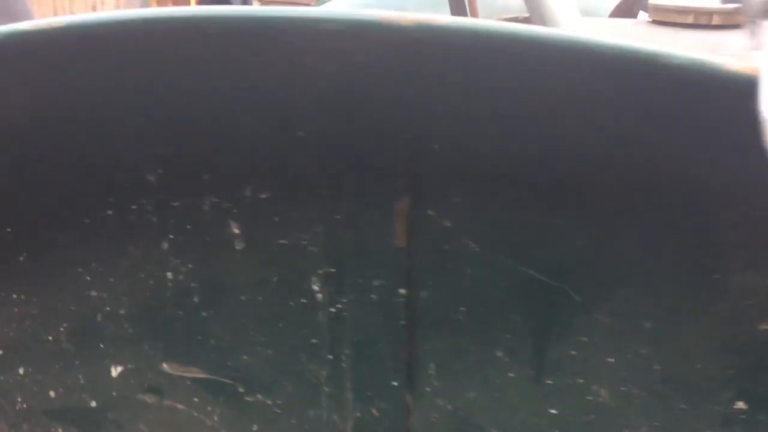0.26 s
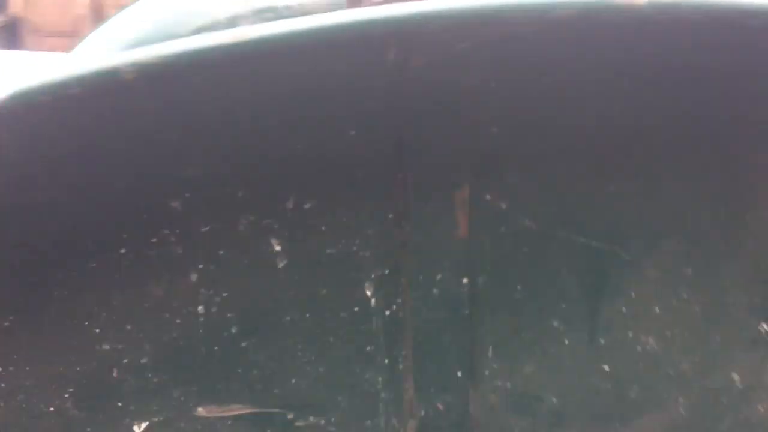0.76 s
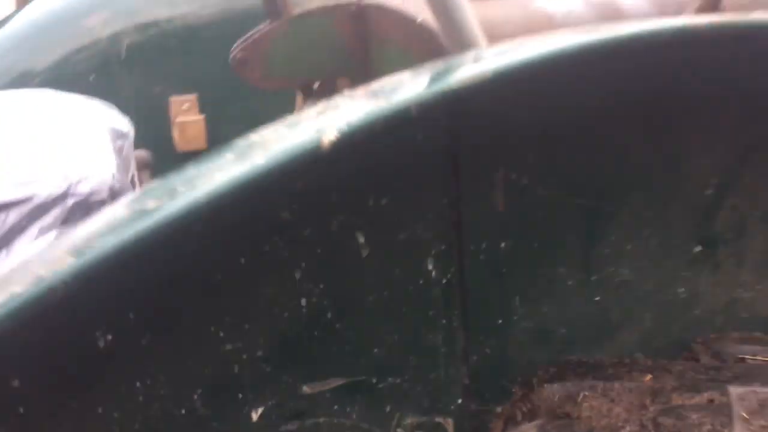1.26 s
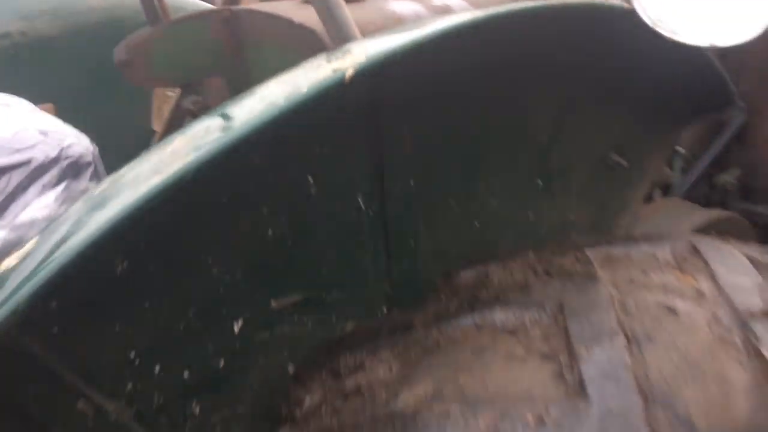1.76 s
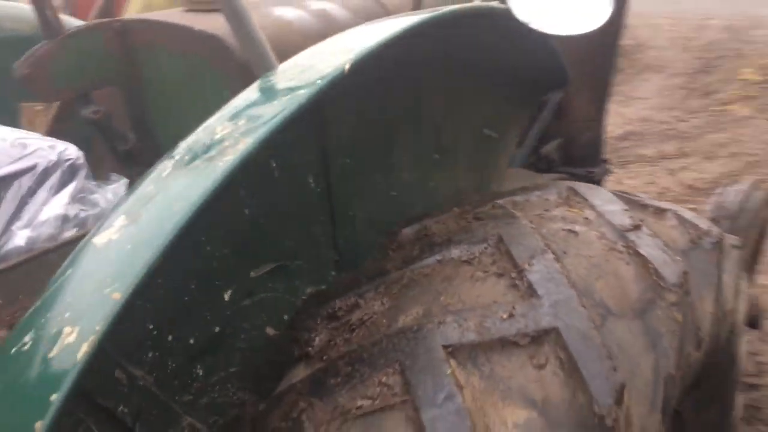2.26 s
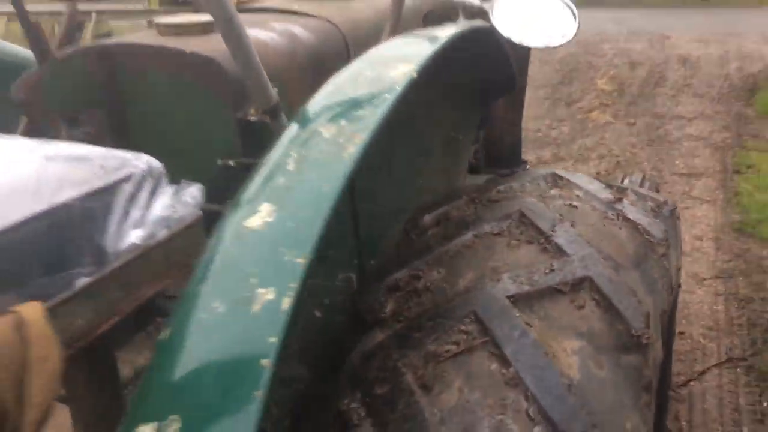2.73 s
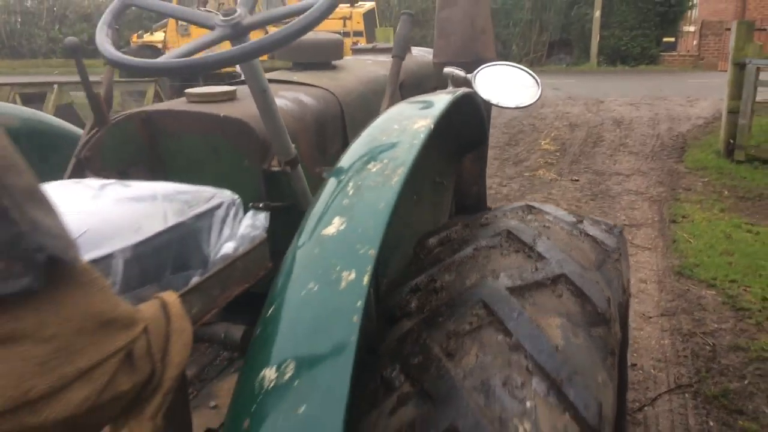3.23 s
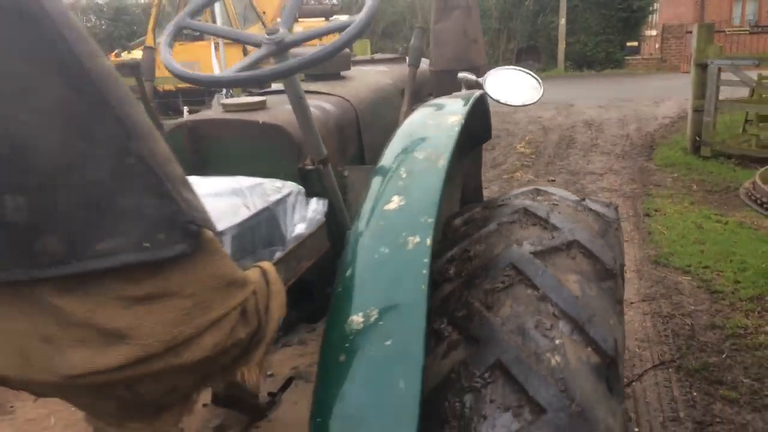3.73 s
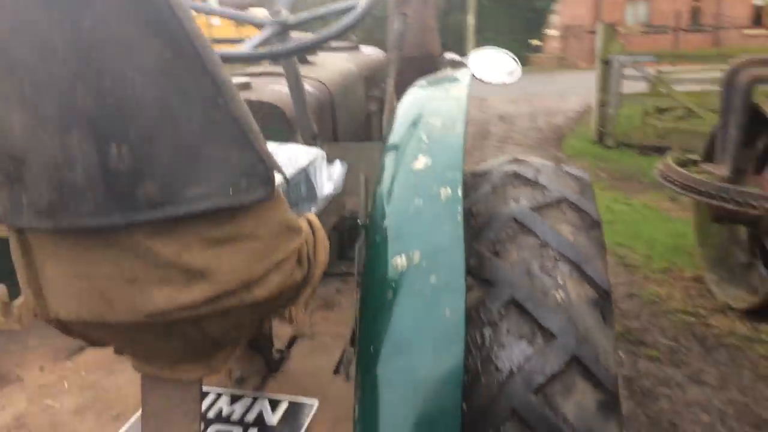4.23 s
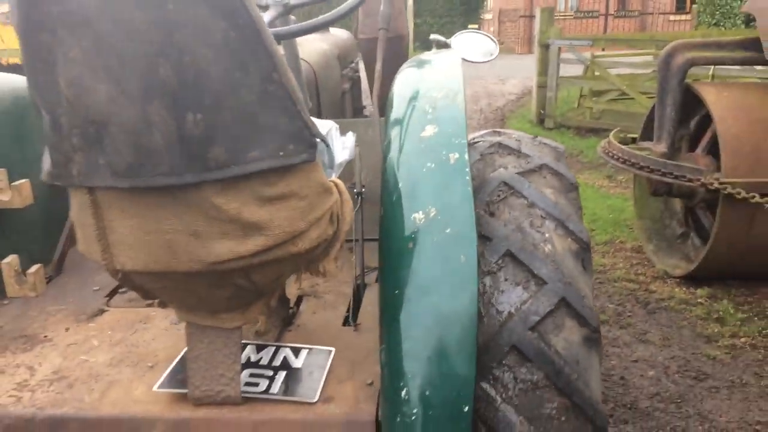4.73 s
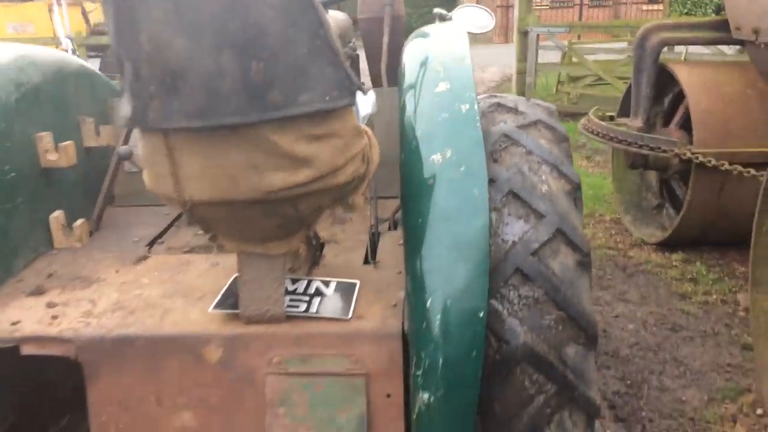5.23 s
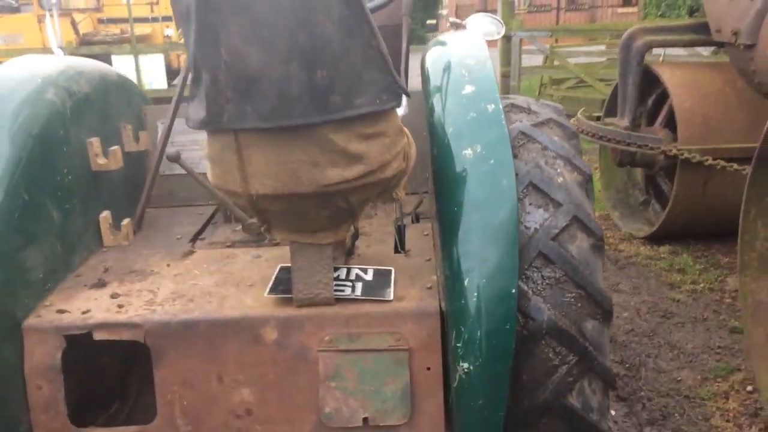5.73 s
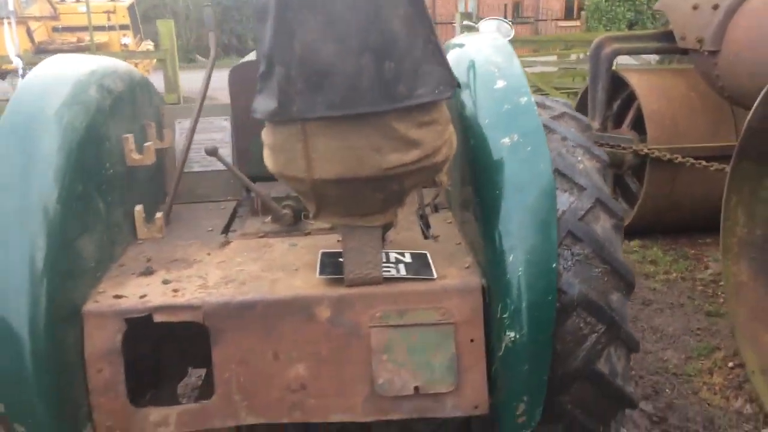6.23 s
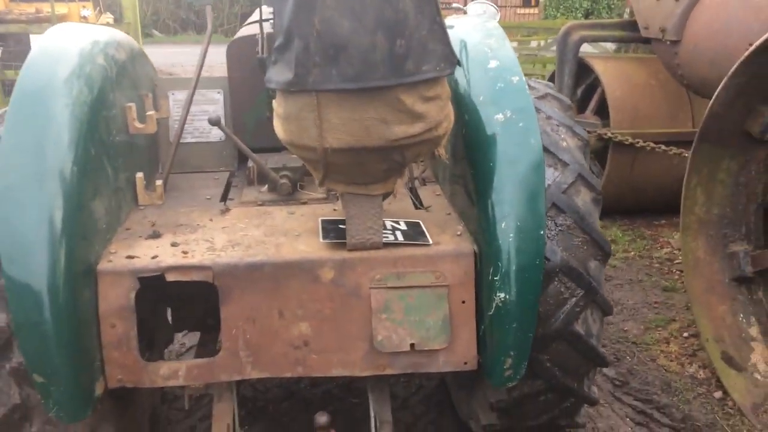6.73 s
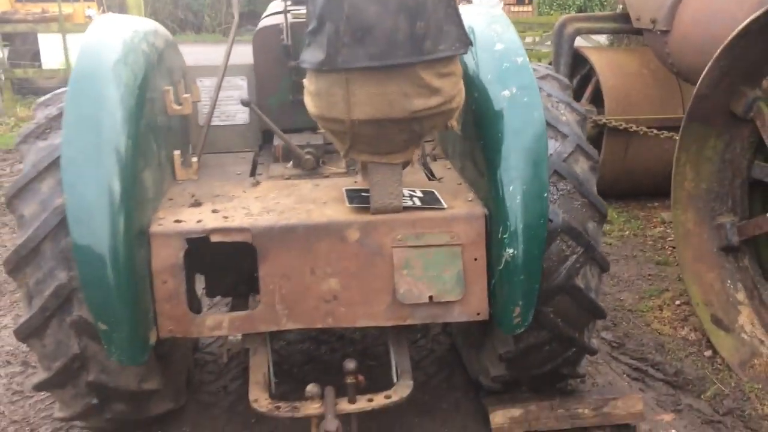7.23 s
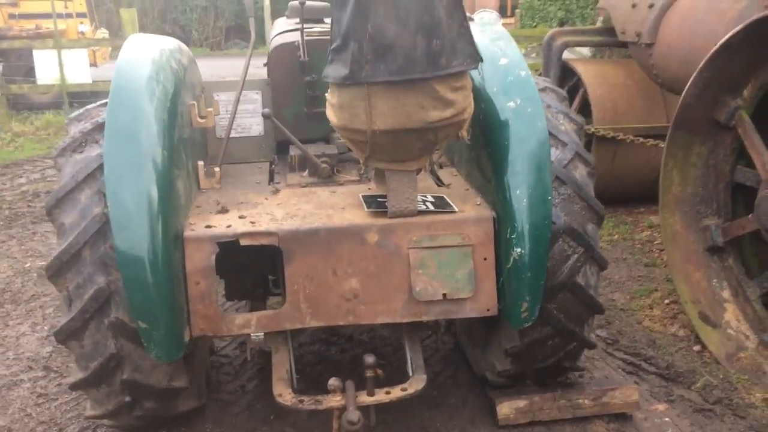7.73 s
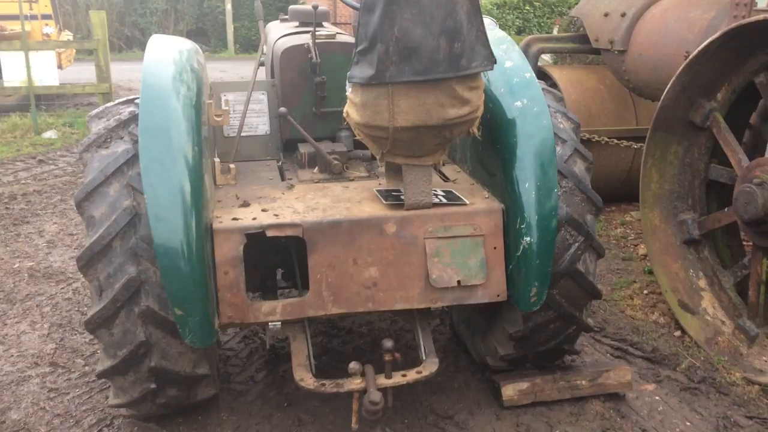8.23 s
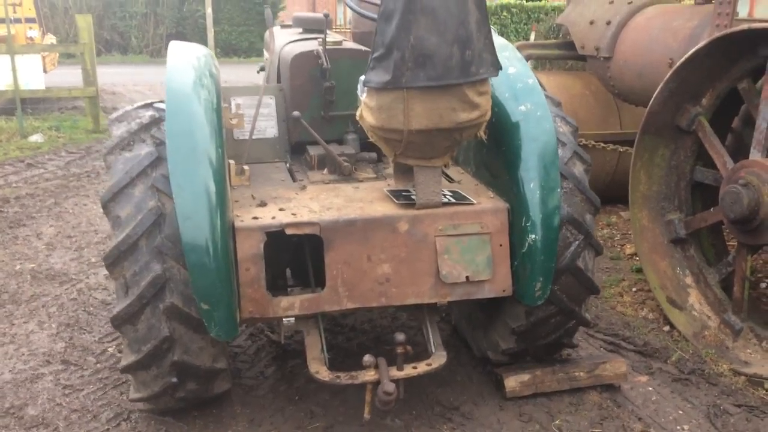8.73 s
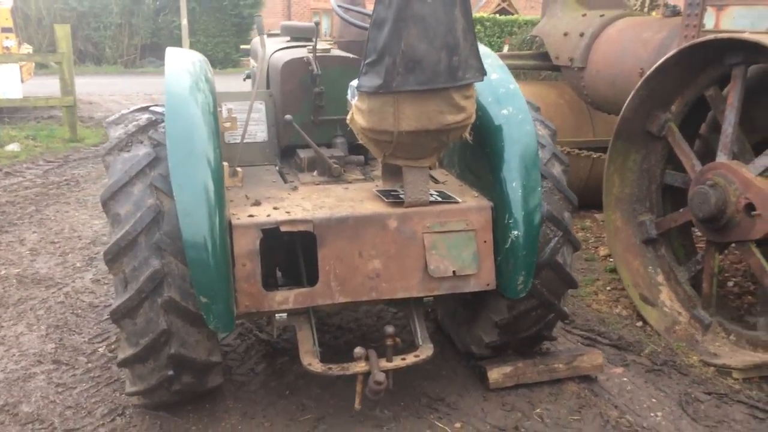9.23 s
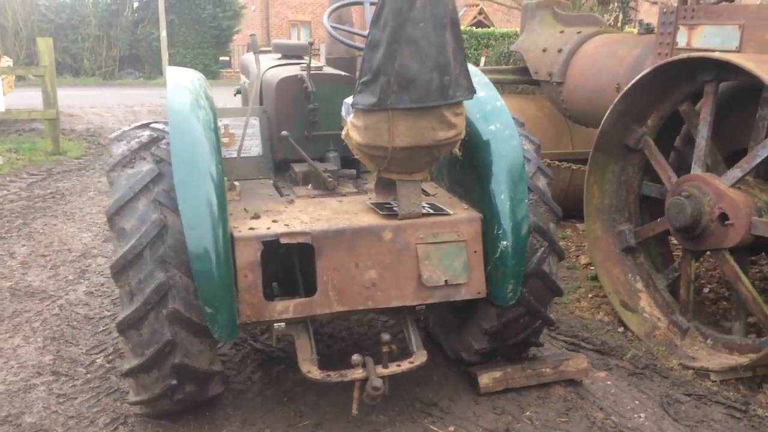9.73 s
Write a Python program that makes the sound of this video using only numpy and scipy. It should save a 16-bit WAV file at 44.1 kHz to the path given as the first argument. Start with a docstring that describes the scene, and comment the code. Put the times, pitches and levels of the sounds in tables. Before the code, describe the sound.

Close beside a running vintage tractor outdoors: fast regular thudding exhaust with short reflections, dense metallic rattling, clinking levers and a pulsing hiss. A dull low rumble touches the microphone at first, and a loose metal part rings now and then later. Moving round to the rear, the sheet-metal resonance shifts and fades, the clatter turns briefly hollow, and the pops lose force while the beat never changes.

```python
"""An old single-cylinder diesel tractor runs in a yard, nine firings a second; the microphone starts at its wheel.
Every turn a pop rings the exhaust stack with echoes, intake and crankcase boom, gears clatter, gas hisses in a
wave and the diesel knock rings the block; the sheet metal swells and fades as the microphone passes its lobes.
From 2.6 s a loose part rings now and then. At the seat, near 4.7 s, bright spits of gas are clearest; near 6.3 s
the platform hollows the clatter. By 9.5 s the microphone is behind the tractor, with weaker exhaust and clatter."""
import sys
import numpy as np
from scipy import signal
from scipy.fft import next_fast_len
from scipy.io import wavfile
from scipy.ndimage import uniform_filter1d, minimum_filter1d

SR = 44100
rng = np.random.default_rng(int(sys.argv[2]) if len(sys.argv) > 2 else 0)


def transcribe(signal):
    """Save signal, clipped to [-1, 1], as a 16-bit WAV file at the path in sys.argv[1]."""
    frames = np.atleast_2d(signal).T
    limited = np.clip(frames, -1, 1)
    pcm = np.round(limited * 32767).astype(np.int16)
    wavfile.write(sys.argv[1], SR, pcm)


N = 440118
TIME = np.arange(N) / SR


def amp(db):
    """Decibels to gain."""
    return 10 ** (np.asarray(db) / 20)


def evened(x):
    """Scales to unit rms."""
    return x / np.sqrt(np.mean(x ** 2) + 1e-20)


def drift(count):
    """Slow chance, with count free values over the whole scene."""
    return np.interp(np.arange(N), np.linspace(0, N, count), rng.standard_normal(count))


def softened(x, hz):
    """Rounds the edge of a push with a second-order low-pass."""
    return signal.lfilter(*signal.butter(2, hz, fs=SR), x)


def resonate(x, hz, width):
    """A fixed resonance of gain 1 at its centre."""
    return signal.lfilter(*signal.iirpeak(hz, hz / width, SR), x)


def coloured(x, spectrum):
    """Gives x a spectrum of (Hz, dB) points in minimum phase, without ringing ahead of a blow."""
    hz, db = np.transpose(spectrum)
    size = next_fast_len(2 * len(x))
    bins_hz = abs(np.fft.fftfreq(size, 1 / SR)) + 1
    log_gain = np.log(amp(np.interp(np.log(bins_hz), np.log(hz), db)))
    response = np.exp(signal.hilbert(log_gain).conj())
    return np.fft.ifft(np.fft.fft(x, size) * response).real[:len(x)]


# Moments in seconds when the microphone is at the wheel, at the seat, and behind the tractor.
MIC_PLACES = [1, 4.5, 9.5]


def along_walk(near_db, far_db):
    """A gain that slides from its value beside the wheel to its value behind the tractor."""
    return np.interp(TIME, MIC_PLACES[::2], amp([near_db, far_db]))


# The walk away from the wheel. Each row: time in seconds, share of the way to behind the tractor.
MIC_WAY = [(1, 0.089), (4.5, 0.7), (9.5, 0.95)]


def on_way(near, far):
    """A value that follows the microphone's distance from the wheel."""
    return near + (far - near) * np.interp(TIME, *np.transpose(MIC_WAY))


def clatter_gain(start_db=2.5, fade_db_per_s=0.2631):
    """The engine's clatter fades steadily as the microphone walks away."""
    return amp(start_db - fade_db_per_s * TIME)


# The crankshaft: a turn starts a little longer than TURN_S, and the lag dies away as the engine settles.
FIRST_POP_S, TURN_S, LAG_S, SETTLE_TURNS = 0.0842, 0.111656, 0.001013, 25


def pop_times():
    """Turn numbers and the moments of their exhaust pops, from just before the scene to its end."""
    turns = np.arange(-2, N / SR / TURN_S + 1)
    lag = LAG_S * SETTLE_TURNS * (1 - np.exp(-turns / SETTLE_TURNS))
    return turns, FIRST_POP_S + TURN_S * turns + lag


def each_turn(after_ms, spread_db, jitter_ms):
    """One click a turn, a set time after the pop, never quite alike."""
    pops_s = pop_times()[1]
    late, strong = rng.standard_normal((len(pops_s), 2)).T
    at = np.round((pops_s + (after_ms + jitter_ms * late) / 1000) * SR).astype(int)
    inside = (at >= 0) & (at < N)
    return np.bincount(at[inside], amp(spread_db * strong)[inside], N)


def over_turn(swells, steady_db):
    """A gain that repeats with the crank angle: swells rise and die away over a steady level."""
    turns, pops_s = pop_times()
    turn_ms = 1000 * TURN_S
    angle = np.linspace(0, 1, 512)
    power = amp(steady_db) ** 2
    for peak_ms, db, rise_ms, fall_ms in swells:
        since = (angle * turn_ms - peak_ms) % turn_ms
        shape = np.maximum(np.exp(-since / fall_ms), np.exp((since - turn_ms) / rise_ms))
        power = power + (amp(db) * shape) ** 2
    crank = np.interp(TIME, pops_s, turns) % 1
    return np.interp(crank, angle, np.sqrt(power))


def rumble(near_db=-36, far_db=-50, hz=40, width=25):
    """A dull low rumble of wind or handling at the microphone, resonated noise strongest at the start."""
    low = resonate(rng.standard_normal(N), hz, width)
    low = evened(resonate(low, hz, 2 * width))
    return low * amp(np.interp(TIME, [1.5, 4], [near_db, far_db]))


# A loose part heard now and then. Each row: start in seconds, relative level in dB, pitch in Hz.
LOOSE_RINGS = [(2.646, -32, 2120), (2.858, -34, 2100), (3.42, -29, 2000), (6.216, -37, 2240),
               (6.326, -31, 2090), (6.661, -28, 2030), (6.882, -27.5, 2080), (7.22, -32, 2020),
               (7.333, -32, 2160)]


def loose_part(rise_s=0.013, width=110, level_db=-2):
    """A short chatter of noise excites one metal mode."""
    out = np.zeros(N)
    for start_s, db, hz in LOOSE_RINGS:
        age = np.maximum(TIME - start_s, 0) / rise_s
        swell = age * np.exp(1 - np.minimum(age, 50))
        out += amp(db) * swell * evened(resonate(rng.standard_normal(N), hz, width))
    return amp(level_db) * out


def spits(after_ms=74, level_db=-43, spread_db=4, t60=0.073, low_hz=5500, high_hz=12000,
          loudest_s=4.7, reach_s=1, elsewhere_db=-6):
    """A bright spit of gas opens each wave of hiss, uneven from turn to turn and clearest beside the seat."""
    t = TIME[:SR // 8]
    clicks = each_turn(after_ms, spread_db=spread_db, jitter_ms=2)
    burst = signal.oaconvolve(clicks, amp(-60 * t / t60))[:N]
    band = signal.butter(1, [low_hz, high_hz], "band", fs=SR)
    gas = evened(signal.lfilter(*band, rng.standard_normal(N)))
    away = 1 - np.exp(-((TIME - loudest_s) / reach_s) ** 2)
    return amp(level_db + elsewhere_db * away) * burst * gas


def hiss_band(hz, width):
    """A narrow band of noise that follows a centre frequency."""
    slow_noise = evened(softened(rng.standard_normal(N), width / 2))
    return slow_noise * np.cos(2 * np.pi * np.cumsum(hz * np.ones(N)) / SR)


# Colour of the gas before the microphone's place alters it. Each row: frequency in Hz, relative level in dB.
HISS_COLOUR = [(500, -44), (1500, 6), (2800, -0.5), (4300, -1), (6000, -5.5), (8000, -9.5), (11000, -16.5),
               (15000, -26)]
# A sharp spit, a long wave of gas, and a second spit about the knock, over a steady leak.
# Each row: peak in ms after the pop, relative level in dB, rise in ms, fall in ms.
HISS_WAVES = [(82.7, 4, 3.7, 6.1), (88, 5, 24, 59), (108.4, -0.5, 2.5, 12)]
# Hiss level along the walk. Each row: time in seconds, relative level in dB.
HISS_WALK = [(0.0, -38), (2.0, -43), (4.8, -39.5), (8.0, -39.0), (10.0, -41)]


def hiss(level_db=-39.5, steady_db=-10.5, hump_db=-5, hump_start_hz=6050, hump_sag_hz_per_s=185,
         hump_width=1100, guard_db=-6, guard_hz=3350, guard_width=600,
         shade_hz=7000, near_db=2.5, far_db=-1, surge_db=0.5, flutter_db=1):
    """Gas hisses in a wave each turn and dulls along the walk; a band stands out by the mudguard, another after.

    The further band, reinforced by a reflection, sinks in pitch as the microphone walks."""
    back = np.interp(TIME, [1.5, 3.5], [0, 1])
    gas = evened(coloured(rng.standard_normal(N), HISS_COLOUR))
    dull = signal.oaconvolve(gas, signal.firwin(21, shade_hz, fs=SR), "same")
    bright = gas - dull
    gas = dull + bright * amp(np.interp(TIME, MIC_PLACES, [near_db, 0, far_db]))
    hump_hz = hump_start_hz - hump_sag_hz_per_s * TIME
    gas = gas + back * amp(hump_db) * hiss_band(hump_hz, hump_width)
    gas = gas + (1 - back) * amp(guard_db) * hiss_band(guard_hz, guard_width)
    walk_db = np.interp(TIME, *np.transpose(HISS_WALK)) + flutter_db * drift(count=400)
    waves = evened(gas * over_turn(HISS_WAVES, steady_db) * amp(walk_db))
    return amp(level_db + surge_db * drift(count=110)) * waves


# Sheet-metal modes of mudguards, bonnet and platform, radiating in lobes the microphone walks through.
# Each row: frequency in Hz, width in Hz, relative level in dB, middle of one lobe in seconds,
# spacing from lobe to lobe in seconds.
PANEL_MODES = [(92, 42, -27.5, 0.45, 15), (122.2, 7.6, -34.5, .8, 4.4), (287.2, 35, -27.5, 2.8, 7.4),
               (399.3, 21.6, -32, 2.2, 2.36), (516, 26, -35, 1.07, 2.66), (523, 14, -32.5, 11, 11.9),
               (618.3, 39, -30.5, 3.18, 5.14), (760, 73, -44.5, 1.3, 6), (959.5, 6.1, -38.5, 4.8, 2.5),
               (1048, 33, -42, 3.2, 10), (1326, 16, -42, 4.2, 4.9), (1756, 110, -43.5, 5, 3.3)]


def panels(shake, level_db=-1, lobe_dip_db=9.5, fade_db_per_s=0.37):
    """The engine shakes the sheet metal; each mode swells and fades as the microphone passes its lobes."""
    out = np.zeros(N)
    for hz, width, db, lobe_s, spacing_s in PANEL_MODES:
        ring = resonate(resonate(shake, hz, width), hz, 4 * width)
        # a steady engine keeps each mode equally excited
        ring = ring / np.sqrt(uniform_filter1d(ring ** 2, SR) + 1e-20)
        dip = np.sin(np.pi * (TIME - lobe_s) / spacing_s) ** 2
        out += ring * amp(db - lobe_dip_db * dip)
    return amp(level_db - fade_db_per_s * TIME) * out


# Swells of gear rattle in each turn, over a steady chatter.
# Each row: peak in ms after the pop, relative level in dB, rise in ms, fall in ms.
GEAR_SWELLS = [(77.44, 2.2, 6.3, 2.7), (98.9, 1.2, 7.1, 13)]
GEAR_STEADY_DB = -7.5


def clinks(level_db=-39, spread_db=4.0, t60=0.11, low_hz=750, high_hz=2000, count=16):
    """Levers and brackets are shaken around each firing; each rings briefly at its own pitch."""
    chance = over_turn(GEAR_SWELLS, GEAR_STEADY_DB) ** 2
    chance = 45 / SR * chance / chance.mean()  # about 45 a second
    size = (rng.random(N) < chance) * amp(spread_db * np.clip(rng.standard_normal(N), -2, 2))
    part = rng.integers(0, count, N)
    t, out = TIME[:SR // 8], np.zeros(N)
    for k, hz in enumerate(np.geomspace(low_hz, high_hz, count)):
        tone = np.sin(2 * np.pi * hz * rng.uniform(0.92, 1.03) * t)
        ring = tone * amp(-60 * t / t60) * (1 - np.exp(-t / 0.0018))
        out += signal.oaconvolve(size * (part == k), ring * low_hz / hz)[:N]
    return amp(level_db) * clatter_gain() * evened(out)


# Colour of the gear rattle. Each row: frequency in Hz, relative level in dB.
RATTLE_COLOUR = [(25, -9.5), (60, 6.5), (140, 8), (280, 6), (450, 5), (950, -1), (1400, -4.5), (1900, -10),
                 (2700, -17), (5000, -26.5), (15000, -47.5)]


def rattle(level_db=-27.0):
    """Gear teeth and linkages chatter densely and evenly, hardest around the firing."""
    grain_db = 2.2 * np.clip(drift(count=5000), -1.5, 1.5) + 0.7 * drift(count=300)
    ticks = rng.standard_normal(N) * over_turn(GEAR_SWELLS, GEAR_STEADY_DB) * amp(grain_db)
    return amp(level_db) * clatter_gain() * evened(coloured(ticks, RATTLE_COLOUR))


# Metal blows in each turn, the loudest being the diesel knock.
# Each row: time in ms after the pop, relative level in dB.
METAL_BLOWS = [(48, -3), (68, -15.5), (83, -2), (91, 0.5), (103.6, 4.5), (109, -2.5)]
# Colour of the engine block. Each row: frequency in Hz, relative level in dB.
BLOCK_COLOUR = [(60, -36), (150, -1), (280, 1), (420, -4.5), (620, -1.5), (800, -3.5), (1200, -3),
                (1800, -9), (2600, -20), (5000, -30.5), (15000, -41)]


def knocks(level_db=-29.0, t60=0.1, ring_t60=0.39, ring_db=-13, swell_s=0.0007, count=6):
    """Blows ring the block's dense modes; the mix of modes changes with the listening angle."""
    blows = sum(amp(db) * each_turn(ms, spread_db=0.8, jitter_ms=0.08) for ms, db in METAL_BLOWS)
    t = TIME[:SR // 4]
    fading = amp(-60 * t / t60) + amp(ring_db - 60 * t / ring_t60)
    fading = fading * (1 - np.exp(-t / swell_s))  # the ring takes a moment to spread through the casting
    out = np.zeros(N)
    for angle in np.eye(count):
        share = np.interp(TIME, np.linspace(0, TIME[-1], count), angle)
        modes = fading * rng.standard_normal(len(t))
        out += np.sqrt(share) * evened(signal.oaconvolve(blows, modes)[:N])
    return amp(level_db) * clatter_gain() * evened(coloured(out, BLOCK_COLOUR))


def past_platform(x, echo=0.21, near_ms=1.78, far_ms=1.237, middle_s=6.27, reach_s=1.3, shade_db=-1):
    """Behind the seat the clatter is shaded and glances off the platform: a hollow colour drifting upward."""
    there = np.exp(-((TIME - middle_s) / reach_s) ** 2)
    delay = on_way(near_ms, far_ms) / 1000
    glance = np.interp(TIME - delay, TIME, x)
    return (x + echo * there * glance) * amp(shade_db * there)


# Air intake and crankcase, rung once a turn. Each row: time in ms after the pop, frequency in Hz, width in Hz,
# relative level in dB beside the wheel, the same behind the tractor, polarity.
BOOM_MODES = [(38.84, 56, 6.6, 6, 5.5, -1), (46.07, 137, 4.8, 11, 2.5, 1)]


def booms(push_db=34.0, soft_hz=1200):
    """The intake gulp and the crankcase hum on between the pops as two resonances."""
    rung = np.zeros(N)
    for ms, hz, width, near_db, far_db, sign in BOOM_MODES:
        push = each_turn(ms, spread_db=0.2, jitter_ms=0.098)
        rung += np.sign(sign) * along_walk(near_db, far_db) * resonate(push, hz, width)
    return amp(push_db) * softened(rung, soft_hz)


# Exhaust stack. Each row: frequency in Hz, width in Hz, relative level in dB beside the wheel,
# the same behind the tractor, polarity.
STACK_MODES = [(128.8, 29.9, 12.5, 11.5, 1), (266.4, 43.6, 4.5, 4.5, -1), (387.2, 7.2, -4, -9, -1),
               (525, 99, -14, -12.5, -1), (633, 18, -9, -7, -1)]
# Exhaust echoes from the ground, nearby surfaces and a wall. Each row: delay in ms beside the wheel,
# delay in ms behind the tractor, gain beside the wheel, gain behind the tractor.
STACK_ECHOES = [(7.95, 4.31, 0.67, 0.3), (13.11, 9.78, -0.12, -0.32), (22.36, 22, -0.37, -0.22),
                (39.52, 39.2, 0.14, 0.17), (45.5, 50, 0.17, 0.16)]


def exhaust(pop_db=34.5, low_hz=85, soft_hz=4000, far_gain=0.46):
    """Each pop rings the stack; the direct sound weakens and the echoes shift as the microphone moves."""
    pops = amp(pop_db) * softened(each_turn(0, spread_db=0.7, jitter_ms=0.015), soft_hz)
    pipe = np.zeros(N)
    for hz, width, near_db, far_db, sign in STACK_MODES:
        pipe += np.sign(sign) * along_walk(near_db, far_db) * resonate(pops, hz, width)
    for _ in range(2):  # the narrow mouth radiates little bass
        pipe = signal.lfilter(*signal.butter(1, low_hz, "high", fs=SR), pipe)
    heard = pipe * on_way(1, far_gain)
    for near_ms, far_ms, near_gain, far_echo_gain in STACK_ECHOES:
        delay = on_way(near_ms, far_ms) / 1000
        heard = heard + on_way(near_gain, far_echo_gain) * np.interp(TIME - delay, TIME, pipe)
    return heard


def scene(rattle_shake=0.29):
    """All parts of the running tractor at one microphone."""
    blows, chatter = knocks(), rattle()
    sheet_metal = panels(blows + rattle_shake * chatter)
    clatter = past_platform(blows + chatter + clinks() + sheet_metal)
    air = hiss() + spits()
    return (rumble() + loose_part() + air + clatter + booms() + exhaust())[None]


def record(dry, ceiling=0.69, edge_hz=15350):
    """A limiter holds down the loudest pops; then a low-pass sets the band limit."""
    gain = np.minimum(1, ceiling / (abs(dry[0]) + 1e-9))
    gain = uniform_filter1d(minimum_filter1d(gain, size=400), size=400)  # about 9 ms
    band_limit = signal.firwin(511, edge_hz, window=("kaiser", 9), fs=SR)
    return signal.oaconvolve(dry * gain, band_limit[None], "same")


dry = scene()
out = record(dry)
transcribe(out)
```